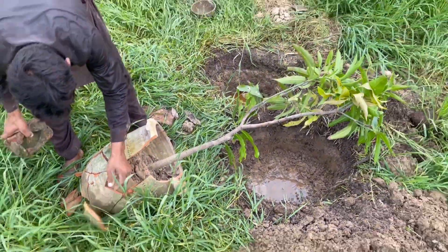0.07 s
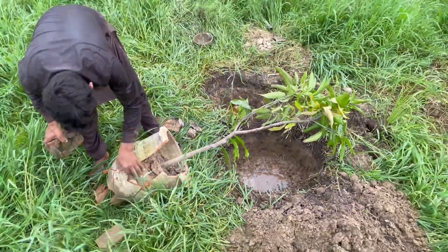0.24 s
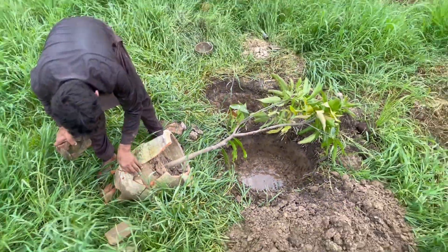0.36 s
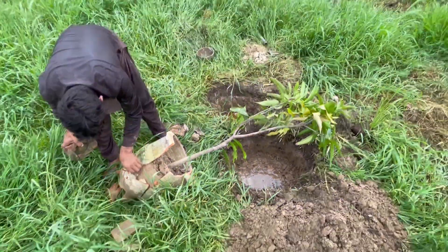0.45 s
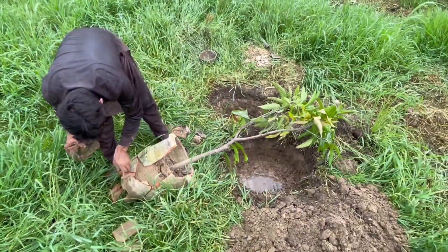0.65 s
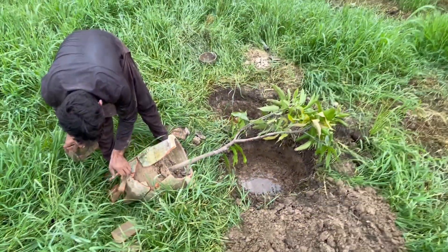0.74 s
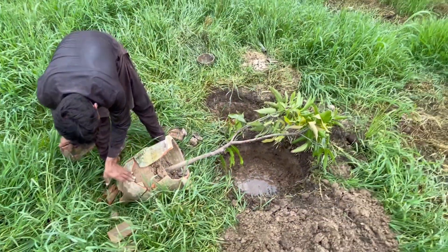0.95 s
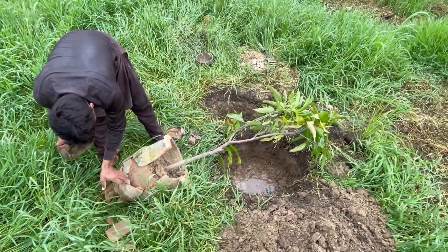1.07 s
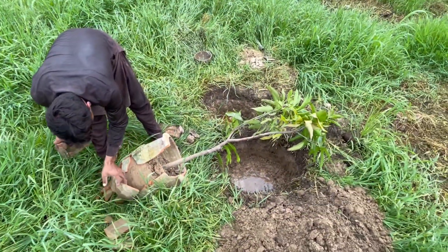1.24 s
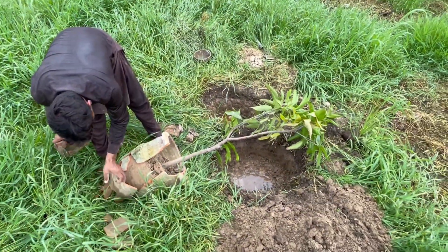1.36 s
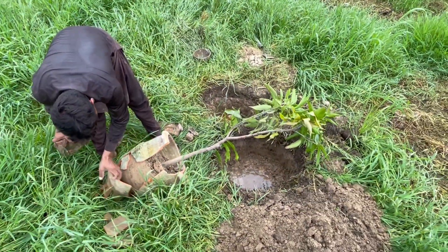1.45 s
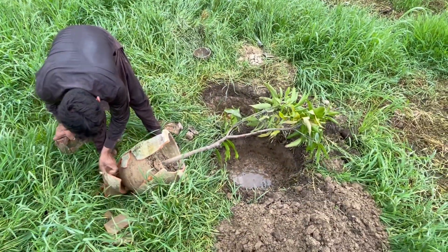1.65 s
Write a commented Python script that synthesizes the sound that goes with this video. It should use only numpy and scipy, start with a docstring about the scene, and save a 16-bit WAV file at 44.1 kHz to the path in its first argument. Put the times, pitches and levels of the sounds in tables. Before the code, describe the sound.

Two hard stone blows on a clay pot, first ringing, second dull, then broken pieces rattle.

```python
"""Outdoors on grass: a stone strikes a clay flowerpot twice, first ringing, then dull on cracked clay.
Each blow sums a short clack, grainy noise and decaying wall modes.
A hand then shifts the loose shards: knocks of tone and noise, pinging flakes, a noisy scrape.
Behind: a low breeze, soft thuds, a faint far drone, a thin hiss with a fluttering band.
Scattered noise taps give the pot a weak echo."""
import sys
import numpy as np
from scipy import signal
from scipy.fft import rfft, irfft
from scipy.io import wavfile
from scipy.ndimage import uniform_filter1d

SR = 44100
rng = np.random.default_rng(int(sys.argv[2]) if len(sys.argv) > 2 else 0)


def master(y):
    """Save y as 16-bit WAV."""
    cut = np.clip(np.atleast_2d(y).T, -1, 1)
    pcm = np.round(cut * 32767)  # scale
    wavfile.write(sys.argv[1], SR, pcm.astype(np.int16))


N = 74970
TIME, FREQ = np.arange(N) / SR, np.fft.rfftfreq(N, 1 / SR)  # s, Hz

# modes of the ringing wall: freq_hz, level_db, t60_s, left_minus_right_db
WALL = [(1540, -24, .13, 6), (2179, -26, .05, 4), (2525, -17.5, .145, -4), (2850, -30, .05, -5),
        (3075, -17, .07, 1), (3655, -26, .055, 4), (3775, -25, .05, -1), (4152, -15, .048, -4),
        (4712, -22, .036, 8), (5050, -21, .02, 1), (5172, -14, .029, 2), (5972, -13, .03, 4),
        (6090, -24, .022, 1), (7790, -22, .022, 3), (8550, -32, .02, -2), (8965, -31, .026, 0)]
# modes of the cracked wall: freq_hz, level_db, t60_s, left_minus_right_db
CRACKED = [(724, -26, .045, 13), (880, -26, .038, 13), (1045, -20, .036, 9), (1220, -28, .018, 10),
           (1407, -33, .06, 4), (1542, -19, .04, 3), (2085, -15, .034, 2), (2340, -22, .018, 0),
           (2530, -25, .026, 3), (2868, -28, .042, 7), (3266, -24, .033, 8), (3820, -26, .024, 4),
           (4190, -26, .014, -1), (7000, -37, .028, -2)]
# crunch spectrum, ringing blow: freq_hz, relative_db_per_hz
SHARP = [(100, -34), (250, -1), (550, -3.5), (720, -5), (950, 0.5), (1300, -18.5), (1900, -7.5), (2900, 3),
         (4300, 5.5), (5200, -7), (6800, -5), (9000, -10.5), (12000, -12), (15000, -30)]
# crunch spectrum, dull blow: freq_hz, relative_db_per_hz
DULL = [(100, -16), (240, 4.5), (550, -2), (1000, 11.5), (1750, -11), (2300, 6), (3600, 5.5), (4800, -14),
        (7000, -5), (9000, -20), (11500, -31), (13000, -62)]

CLAY_LIKENESS = 0.34  # left-right correlation of the clay noises
SHARD_RISE_S = 0.0008


def amp(db):
    """Decibels to gain."""
    return 10 ** (np.asarray(db) / 20)


def unit(x):
    """Scale to rms 1."""
    return x / np.sqrt(np.mean(x ** 2) + 1e-20)


def read(points, hz):
    """Interpolate a spectrum on a log-frequency axis."""
    f, value = np.transpose(points)
    return np.interp(np.log(hz + 1), np.log(f + 1), value)


def level(points):
    """Gain over time from (time_s, level_db) points."""
    return amp(np.interp(TIME, *np.transpose(points)))


def pan(left_minus_right_db):
    """Left and right gains, half the level difference each."""
    d = left_minus_right_db
    return amp(np.array([d, -d]).reshape(2, -1) / 2)


def since(start_s):
    """Time since an event, zero before it."""
    return np.maximum(TIME - start_s, 0)


def rise(t, rise_s):
    """Exponential onset from 0 towards 1."""
    return 1 - np.exp(-t / rise_s)


def band(hz, width_hz):
    """Shape of one band in dB, 6 dB down at hz +- width_hz."""
    return -20 * np.log10(1 + ((FREQ - hz) / width_hz) ** 2)


def noise(db):
    """Noise of rms 1 with the given spectrum in dB."""
    return unit(irfft(rfft(rng.standard_normal(N)) * amp(db), N))


def pair(db, likeness):
    """Stereo noise of rms 1 with the given spectrum in dB and left-right correlation."""
    a, b = rfft(rng.standard_normal((2, N)))
    c = np.clip(likeness, -1, 1)
    right = c * a + np.sqrt(1 - c * c) * b
    return unit(irfft(np.array([a, right]) * amp(db), N))


def lumps(depth_db, size):
    """Randomly flickering gain of rms 1, smoothed over size samples."""
    smooth = unit(np.convolve(rng.standard_normal(N), np.hanning(size), "same"))
    return unit(amp(depth_db * smooth))


def steady(x, size):
    """Divide out the running rms over size samples, so that a burst has a set strength."""
    return x / np.sqrt(abs(uniform_filter1d(x * x, size)) + 1e-9)


def ring(start_s, modes):
    """Struck clay: a sum of decaying modes, each with its own left-right balance."""
    t = since(start_s)
    out = np.zeros((2, N))
    for hz, db, t60_s, side_db in modes:
        out += pan(side_db) * amp(db - 60 * t / t60_s) * np.sin(2 * np.pi * hz * t)
    return rise(t, 0.001) * out


def pulse(start_s, hz, peak_s):
    """Short push: a sine under an envelope that peaks at 1 after peak_s."""
    t = since(start_s)
    return t / peak_s * np.exp(1 - t / peak_s) * np.sin(2 * np.pi * hz * t)


def place(x):
    """Set a sound at the pot, left of centre, by frequency-dependent level difference."""
    # freq_hz, left_minus_right_db
    pot_pan = [(100, 2), (350, 4), (650, 11), (1150, 11), (2000, 2), (3700, 1), (6700, 2), (12000, 0)]
    return irfft(rfft(x) * pan(read(pot_pan, FREQ)), N)


def blows():
    """Stone on pot: a clack, a grainy crunch of crushed clay and the ring of the wall."""
    # start_s, ring_gain_db, modes, crunch_db, crunch_spectrum, crunch_t60_s, clack_db, clack_hz
    blow_rows = [(0.2276, 1, WALL, -24.5, SHARP, 0.078, -15, 1157),
                 (0.7436, -2.5, CRACKED, -20, DULL, 0.05, -29, 1017)]
    out = np.zeros((2, N))
    for start_s, ring_db, modes, crunch_db, colour, t60_s, clack_db, clack_hz in blow_rows:
        t = since(start_s)
        grains = pair(read(colour, FREQ), CLAY_LIKENESS) * lumps(depth_db=5, size=45)
        crunch = steady(grains, size=170) * rise(t, 0.0015) * amp(crunch_db - 60 * t / t60_s)
        clack = amp(clack_db) * pulse(start_s, clack_hz, peak_s=0.0009)
        out += amp(ring_db) * ring(start_s, modes) + place(crunch + clack)
    return out


def shards():
    """Loose pieces: short hollow knocks with grit, each faintly ringing the cracked wall."""
    # start_s, level_db, pitch_hz, decay_s, grit_db
    shard_rows = [(0.288, -50, 1460, 0.0064, -41), (0.435, -46, 890, 0.0071, -49.5),
                  (.450, -45, 920, 0.0038, -54), (0.479, -40, 1260, 0.0064, -49.5),
                  (0.586, -49.5, 900, 0.015, -60), (.651, -45.5, 860, 0.0045, -51),
                  (0.813, -50.5, 2050, 0.013, -51), (0.854, -45.5, 950, 0.012, -44.5),
                  (1.108, -50.5, 725, 0.012, -55), (1.144, -35.5, 1300, 0.0035, -38.5),
                  (1.18, -47, 1090, 0.0036, -52), (1.213, -41.5, 663, 0.0057, -46.5),
                  (1.241, -39, 900, 0.004, -67), (1.264, -48.5, 850, 0.0069, -60),
                  (1.286, -35.5, 910, 0.0037, -46), (1.316, -34, 990, 0.0032, -41),
                  (1.326, -40.5, 1310, 0.0079, -43), (1.391, -44, 1010, 0.0039, -69),
                  (1.472, -46, 1300, 0.0049, -60), (1.501, -52, 1210, 0.018, -48)]
    # freq_hz, relative_db_per_hz
    grit_spectrum = [(200, -6), (600, 6), (1500, -8.5), (2700, 9.5), (3900, -1), (4900, -3), (7000, 1.5),
                     (9000, -7.5), (11300, -11), (12500, -40), (14000, -80)]
    chatter_width_octaves, tone_db, ring_db = 0.28, -10.5, -17  # both dB relative to the knock
    knocks, strikes = np.zeros((2, N)), np.zeros((2, N))
    grit = pair(read(grit_spectrum, FREQ), CLAY_LIKENESS) * lumps(depth_db=2, size=60)
    for start_s, db, hz, decay_s, grit_db in shard_rows:
        t = since(start_s)
        decay = np.exp(-t / decay_s)
        octaves = np.log2((FREQ + 1) / hz)
        chatter = noise(-20 * np.log10(1 + (octaves / chatter_width_octaves) ** 2))
        # the tone decays twice over, so it dies before the chatter
        tone = amp(tone_db) * np.sin(2 * np.pi * hz * t) * decay
        hollow = tone + steady(chatter, size=200)
        knocks += (amp(db) * hollow + amp(grit_db) * grit) * rise(t, SHARD_RISE_S) * decay
        strikes[:, round(start_s * SR)] += amp(db + ring_db)
    rings = signal.fftconvolve(strikes, ring(0, CRACKED), axes=1)[:, :N]
    return rings + place(knocks)


def flakes():
    """Small flakes: each pings as one decaying sine."""
    # start_s, level_db, pitch_hz, t60_s
    flake_rows = [(.603, -35, 6960, 0.055), (1.265, -45, 4700, 0.052)]
    pings = np.zeros(N)
    for start_s, db, hz, t60_s in flake_rows:
        t = since(start_s)
        pings += rise(t, SHARD_RISE_S) * amp(db - 60 * t / t60_s) * np.sin(2 * np.pi * hz * t)
    return place(pings)


def scrape():
    """Clay dragged over soil by the hand: grainy coloured noise under a level curve."""
    # time_s, level_db
    scrape_level = [(0, -96), (.2, -59.5), (.42, -56), (.55, -57.5), (.72, -59), (.9, -60), (1.05, -55.5),
                    (1.2, -53), (1.36, -56.5), (1.49, -51.5), (1.56, -56), (1.7, -57.5)]
    # freq_hz, relative_db_per_hz
    scrape_spectrum = [(120, -7), (300, 6), (600, -0.5), (900, -2), (1400, 3), (1900, -4.5), (2700, -0.5),
                       (4000, -12), (7000, -10.5), (11000, -55), (13000, -70)]
    rubbing = pair(read(scrape_spectrum, FREQ), CLAY_LIKENESS) * lumps(depth_db=1.5, size=260)
    return place(rubbing * level(scrape_level))


def stagger(x):
    """Shift the right channel's phase against the left, frequency by frequency."""
    # freq_hz, right_lag_rad
    right_lag = [(20, 0), (300, .3), (750, .6), (1100, 1.5), (1540, 1.4), (2100, -.9), (2525, .9),
                 (3075, 2.1), (3650, .3), (4150, .5), (5170, 1.2), (5970, .1), (7800, 2), (9000, .6)]
    left, right = x
    right = irfft(rfft(right) * np.exp(-1j * read(right_lag, FREQ)), N)
    return np.array([left, right])


def outdoors(x):
    """Scatter from the ground and one dull, smeared echo: decaying band-shaped noise taps."""
    # delay_s, level_db, t60_s, centre_hz, width_hz
    scatter_rows = [(0, -24, .14, 2600, 2200), (.103, -21, .22, 1750, 480)]
    scatter = np.zeros((2, N))
    for delay_s, db, t60_s, hz, width_hz in scatter_rows:
        decay = (TIME > delay_s) * amp(-60 * since(delay_s) / t60_s)
        taps = rng.standard_normal((2, N)) * decay
        taps /= np.linalg.norm(taps[0])
        scatter += irfft(rfft(taps) * amp(db + band(hz, width_hz)), N)
    return x + signal.fftconvolve(x, scatter, axes=1)[:, :N]


def breeze():
    """Low wind: coloured noise, evened out, then swelling along a level curve."""
    # time_s, level_db
    breeze_level = [(0, -40.5), (.13, -65), (.4, -55), (.62, -52.5), (.8, -59.5), (.88, -40.5), (.97, -57),
                    (1.06, -49.5), (1.15, -38.5), (1.27, -48), (1.35, -43.5), (1.44, -43.5), (1.54, -50),
                    (1.7, -47)]
    # freq_hz, relative_db_per_hz
    breeze_spectrum = [(20, -81), (35, -22.5), (55, 5.5), (90, -4), (135, -7.5), (190, -16), (300, -29.5),
                       (600, -30), (2000, -101)]
    # freq_hz, left_right_correlation
    breeze_likeness = [(20, .1), (55, 0.13), (90, 1), (130, 0.73), (300, 1), (1000, 0.26)]
    wind = pair(read(breeze_spectrum, FREQ), read(breeze_likeness, FREQ))
    return steady(wind, size=3000) * level(breeze_level)


def thuds():
    """Soft low thuds: short sine pulses."""
    # start_s, level_db, pitch_hz
    thud_rows = [(0.87, -50.5, 65), (1.123, -43, 74), (1.404, -31, 59.4)]
    return sum(amp(db) * pulse(start_s, hz, peak_s=0.009) for start_s, db, hz in thud_rows)


def drone():
    """Faint far drone: narrow-band noise under a level curve."""
    # time_s, level_db
    drone_level = [(0, -67), (.18, -48), (.33, -45.5), (.47, -52.5), (.62, -58), (1.1, -57), (1.7, -58)]
    return steady(noise(band(hz=122.4, width_hz=11)), size=3000) * level(drone_level)


def hiss():
    """Thin steady hiss plus a randomly fluttering, insect-like band."""
    # freq_hz, relative_db_per_hz
    hiss_spectrum = [(150, 6.5), (350, 1.5), (700, -5), (1500, -11.5), (3000, -12.5), (4400, -18),
                     (5000, -3), (5450, 0.5), (5900, -6), (6500, -14), (7000, -4), (7550, 3), (8400, -9.5),
                     (9000, -4), (9700, 0), (10500, -13.5), (11300, -5), (12200, -32), (13000, -65)]
    likeness, hiss_db, flutter_db = 0.1, -54.5, -63
    floor = amp(hiss_db) * pair(read(hiss_spectrum, FREQ), likeness)
    flutter = pair(band(hz=5500, width_hz=300), likeness) * lumps(depth_db=4, size=300)
    return floor + amp(flutter_db) * flutter


def background():
    """Low layers and hiss, each leaning slightly left (left-right dB)."""
    return pan(3) * (breeze() + thuds() + drone()) + pan(0.5) * hiss()


def scene():
    """Pot sounds, phase-staggered and scattered, over the background."""
    pot = blows() + shards() + flakes() + scrape()
    return outdoors(stagger(pot)) + background()


def record(dry):
    """Band limit: linear-phase low-pass."""
    edge_hz = 13000
    low_pass = signal.firwin(255, edge_hz, window=("kaiser", 9), fs=SR)
    return signal.oaconvolve(dry, low_pass[None], "same")


dry = scene()
out = record(dry)
master(out)
```